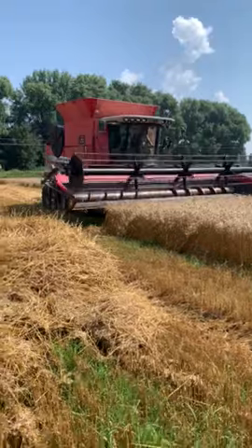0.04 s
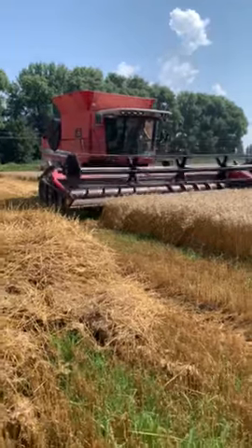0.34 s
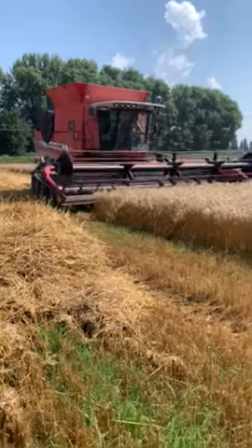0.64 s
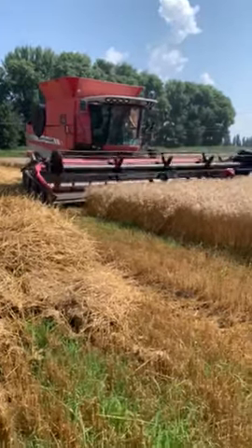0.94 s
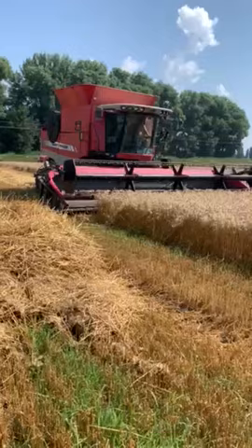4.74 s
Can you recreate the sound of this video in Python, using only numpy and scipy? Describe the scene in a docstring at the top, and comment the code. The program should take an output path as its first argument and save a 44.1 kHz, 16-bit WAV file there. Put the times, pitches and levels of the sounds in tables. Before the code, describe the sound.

Fast, even blade chatter and rhythmic metal knocking ride on the low diesel drone of a combine harvester cutting wheat. Straw hisses and crackles through the machine while panels rattle and steel squeaks faintly now and then. The sound holds steady at first, swells from about halfway as the harvester approaches, then stays louder with harder clicks. A phone picks it up across the open field, with the machine a little to the left.

```python
"""A deep, throbbing rumble of diesel and threshing drum: a combine harvester in a wheat field, cutting
towards a phone held some twenty metres off. The knife bar chatters ten times a second and makes the
header drone, the sieves knock three times on every shake, loose guards rattle, rubbing steel squeals
faintly, and dry straw crackles through the machine. Midway it all grows louder as the harvester nears."""
import sys
import numpy as np
from scipy import signal
from scipy.fft import rfft, irfft, next_fast_len
from scipy.io import wavfile
from scipy.ndimage import uniform_filter1d

SR = 44100
rng = np.random.default_rng(int(sys.argv[2]) if len(sys.argv) > 2 else 0)


def generate_wav(sig):
    """Save sig (samples, or channels by samples) to the path in sys.argv[1] as 16-bit PCM at SR."""
    pcm = np.round(np.clip(np.atleast_2d(sig).T, -1, 1) * 32767).astype(np.int16)
    wavfile.write(sys.argv[1], SR, pcm)


N = 426006
TIME = np.arange(N) / SR
CRANK_HZ, KNIFE_HZ, SIEVE_HZ = 36.39, 9.985, 3.588  # shaft rates at working speed
CLATTER_RISE_DB = 5.5  # what knife and sieves gain as the machine nears


# Drum and fans from across the field: (frequency [Hz], level [dB])
RUMBLE_SPECTRUM = [(20, -82.5), (32, -66), (44, -61.5), (70, -54.5), (100, -54), (135, -57), (190, -52),
                   (260, -58), (330, -60), (400, -67.5), (600, -68.5), (1500, -101)]
# The header's drone: (multiple of the knife rate [-], level [dB])
HEADER_DRONE = [(7, -54), (8, -51.5), (9, -46.5), (10, -47.5), (12, -45.5), (14, -54), (16, -41.5),
                (18, -39), (19, -50.5), (20, -39), (21, -47.5), (22, -47.5), (24, -48), (25, -49.5),
                (27, -44.5), (30, -48), (35, -58)]
# The machine's hollow body: (frequency [Hz], level [dB])
BOOM_SPECTRUM = [(150, -82), (205, -59.5), (240, -55), (285, -56), (320, -57.5), (360, -63), (450, -92)]
def thresher(clock):
    """Drum and fans rumble, the body booms; shaken twice a knife turn, the header drones and throbs."""
    turns = KNIFE_HZ * clock
    throb = 1 + .18 * np.cos(2 * np.pi * (2 * turns - .3))
    rumble = body(hiss() * throb, RUMBLE_SPECTRUM)
    drone = tones(turns + .0022 * walk(2.05), HEADER_DRONE, waver_db=2)
    boom = body(hiss() * throb, BOOM_SPECTRUM)
    return nearing(rise_db=4.5) * (rumble + drone) + nearing(rise_db=9) * boom


# The diesel, some twenty metres off: (multiple of the crank rate [-], level [dB])
DIESEL_ORDERS = [(2, -47.5), (3, -48.5), (7, -46), (9, -40.5), (12, -54), (13, -52.5), (17, -50), (18, -47),
                 (19, -51.5)]
def engine(clock):
    """The diesel hums at multiples of its crank rate; the governor hunts slightly."""
    return tones(CRANK_HZ * clock + .007 * walk(2), DIESEL_ORDERS, waver_db=1.5)


# The rush through the drum, heard from outside: (frequency [Hz], level [dB])
ROAR_SPECTRUM = [(200, -72), (400, -64), (520, -55.5), (700, -59), (950, -66), (1300, -64), (3000, -104.5)]
# The housing's resonance: (frequency [Hz], width [Hz], level [dB])
HOUSING_MODES = [(638, 30, -55.5)]
def drum_roar():
    """Air and crop rush through the hollow drum housing."""
    return body(hiss() * amp(.5 * walk(9)), ROAR_SPECTRUM, HOUSING_MODES)


# Struck steel, for knife, link and clanks alike: (frequency [Hz], level [dB])
STEEL_SPECTRUM = [(300, -100), (900, -67), (2500, -69), (4000, -62.5), (6300, -70.5), (8300, -69.5),
                  (11000, -76), (13000, -86), (16000, -81)]
# The knife bar's resonances: (frequency [Hz], width [Hz], level [dB])
KNIFE_MODES = [(4150, 300, -64), (4800, 520, -65), (8200, 700, -70)]
# Stalks shearing at the front of the machine: (frequency [Hz], level [dB])
SHEAR_SPECTRUM = [(400, -78), (1000, -92), (1800, -68), (2500, -70), (3500, -70), (4600, -85), (6200, -71),
                  (8300, -75.5), (11500, -77.5), (13000, -99), (16000, -102)]
def knife(clock):
    """The bar ticks as it reverses, then shears a ragged row of stalks; the return stroke is weaker."""
    turns = KNIFE_HZ * clock
    tick = strokes(turns, phase=.974, db=-2.7, scatter_db=1.2, rise_s=.0025, decay_s=.007)
    tick_back = strokes(turns, phase=.463, db=-8, scatter_db=2, rise_s=.0022, decay_s=.0085)
    shear = strokes(turns, phase=.01, db=-1, scatter_db=.8, rise_s=.012, decay_s=.022)
    shear_back = strokes(turns, phase=.53, db=-4.8, scatter_db=1.2, rise_s=.012, decay_s=.025)
    ragged = amp(1.8 * walk(130))
    steel = np.hypot(tick, tick_back) * crackle(per_s=10000, spread_db=3)
    stalks = np.hypot(shear, shear_back) * ragged * crackle(per_s=9000, spread_db=1)
    return body(steel, STEEL_SPECTRUM, KNIFE_MODES) + body(stalks, SHEAR_SPECTRUM)


# The knife head's hardest strikes: (time [s], level [dB])
HARD_STRIKES = [(.179, -25), (.401, -24.5), (.459, -23.5), (1.003, -24.5), (2.512, -21.5), (2.914, -24),
                (4.715, -22.5), (5.215, -23), (5.316, -20.5), (5.416, -20), (5.515, -22), (5.615, -21.5),
                (5.917, -22), (6.879, -21.5), (7.62, -17), (7.721, -19), (7.921, -19.5), (8.121, -16.5),
                (8.423, -14.5), (8.524, -19), (8.623, -19), (8.924, -20)]
# Its resonances: (frequency [Hz], width [Hz], level [dB])
HEAD_MODES = [(4700, 260, -43), (4930, 260, -44), (5250, 200, -47), (5540, 160, -51)]
def knife_head(clock):
    """Play in the knife head closes with a high click, part ring, part scrape; some strikes are hard."""
    click_shape = dict(rise_s=.0016, decay_s=.0021)
    regular = strokes(KNIFE_HZ * clock, phase=.977, db=-28, scatter_db=1.8, **click_shape)
    hard = bursts(*np.transpose(HARD_STRIKES), **click_shape)
    clicks = np.maximum(nearing(CLATTER_RISE_DB) * regular, hard)
    ring = unsteady_note(hz=4780, drift_cycles=.13, drift_per_s=500)
    scrape = unit(body(hiss(), STEEL_SPECTRUM, HEAD_MODES))
    ring_share = .7  # of the click's power
    return clicks * (np.sqrt(ring_share) * ring + np.sqrt((1 - ring_share) / 2) * scrape)


# The sieve pan's scuff, inside the machine: (frequency [Hz], level [dB])
PAN_SPECTRUM = [(300, -90), (600, -56.5), (950, -99), (1700, -63.5), (2500, -67.5), (3400, -65.5),
                (4300, -79), (8000, -86.5), (12000, -105), (16000, -113)]
# The link's resonances: (frequency [Hz], width [Hz], level [dB])
LINK_MODES = [(654, 64, -53.5), (1210, 130, -63), (1520, 125, -65.5), (1804, 86, -62), (1854, 64, -56),
              (2280, 130, -63)]
def sieves(clock):
    """On each shake the pan scuffs, then a link knocks sharply and chatters on; one knock is harder."""
    turns = SIEVE_HZ * clock
    scuff = strokes(turns, phase=.0091, db=3.5, scatter_db=.5, rise_s=.0035, decay_s=.019)
    knock = strokes(turns, phase=.416, db=4.5, scatter_db=.8, rise_s=.001, decay_s=.007)
    hard_knock = bursts(times=np.array([4.864]), db=[10.5], rise_s=.001, decay_s=.007)
    chatter = strokes(turns, phase=.46, db=-.5, scatter_db=.8, rise_s=.004, decay_s=.023)
    blows = np.hypot(np.maximum(knock, hard_knock), chatter)
    # the link's main mode, its pitch shaken by the rattling, carries better from close by
    note = unsteady_note(hz=1865, drift_cycles=.12, drift_per_s=60)
    ring = amp(-38.5) * nearing(rise_db=3.5) * blows * note
    pan = body(scuff * hiss(), PAN_SPECTRUM)
    link = body(blows * hiss(), STEEL_SPECTRUM, LINK_MODES, spectrum_db=-8.5)
    return pan + link + ring


# Loose steel at the sieve drive: (frequency [Hz], width [Hz], level [dB])
CLANK_MODES = [(654, 150, -59.5), (1960, 70, -55), (2720, 140, -66), (3560, 95, -62), (5260, 180, -71)]
def clanks(clock):
    """Once a shake the sieve drive reverses: loose steel rattles and one plate rings a clear note."""
    turns = SIEVE_HZ * clock
    reversal = strokes(turns, phase=.619, db=.5, scatter_db=.5, rise_s=.003, decay_s=.02)
    hard_s, hard_db = 8.84, 3.5  # one reversal hits harder than the rest
    force = amp(hard_db * (np.abs(TIME - hard_s) < .5 / SIEVE_HZ))
    ringing = strokes(turns, phase=.63, db=-31.5, scatter_db=1.2, rise_s=.005, decay_s=.017)
    plate = ringing * unsteady_note(hz=1456, drift_cycles=.3, drift_per_s=8)
    rattle = body(force * reversal * crackle(per_s=5900, spread_db=-4.5), STEEL_SPECTRUM, CLANK_MODES)
    return nearing(rise_db=5.5) * rattle + nearing(rise_db=8.5) * plate


# The sheet-metal guards: (frequency [Hz], time to fall 60 dB [s], level [dB])
GUARD_RINGS = [(1145, .055, -49.5), (1245, .1, -44), (1320, .08, -46.5), (1400, .08, -48.5),
               (1604, .09, -50), (1785, .07, -47), (1905, .06, -47)]
def guards(clock):
    """Loose guards rattle without pause, hardest just after each forward knife stroke."""
    taps_per_s, scatter_db = 260, 1.5
    jolt = strokes(KNIFE_HZ * clock, phase=.02, db=1.5, scatter_db=1, rise_s=.002, decay_s=.01)
    taps = (rng.random(N) < taps_per_s / SR) * amp(scatter_db * rng.standard_normal(N)) * (1 + jolt)
    t = TIME[:SR // 4]
    rattle = np.zeros(N)
    for hz, t60, db in GUARD_RINGS:
        ring = amp(-60 * t / t60) * np.sin(2 * np.pi * hz * t)
        strikes = taps * rng.uniform(-1, 1, N)  # every tap rings a new mixture of modes
        rattle += amp(db) * unit(signal.oaconvolve(strikes, ring)[:N])
    return rattle


# Chaff and grain streaming through the machine: (frequency [Hz], level [dB])
CHAFF_SPECTRUM = [(400, -68.5), (900, -74), (1400, -73), (2150, -64), (2450, -66), (3100, -72),
                  (3900, -64.5), (5500, -109), (6500, -72), (9600, -83.5), (11700, -79), (12700, -89),
                  (16000, -81)]
# The panels they brush: (frequency [Hz], width [Hz], level [dB])
PANEL_MODES = [(1240, 170, -63), (1420, 110, -66), (1620, 130, -65.5), (1800, 130, -66), (2630, 110, -70.5),
               (3050, 150, -70.5), (3560, 260, -70), (4170, 200, -68), (4400, 200, -68), (4720, 260, -67),
               (4920, 130, -70), (5240, 200, -70), (5540, 160, -72.5), (6050, 250, -76), (8170, 600, -73),
               (8700, 500, -78), (9650, 350, -78)]
# The finest snaps of straw: (frequency [Hz], level [dB])
SNAP_SPECTRUM = [(2000, -99), (6000, -110), (10500, -80.5), (13000, -105), (16000, -103)]
def straw():
    """Chaff and grain stream along sheet-metal panels, with dry stalks snapping among them."""
    surge = amp(.55 * walk(15))
    flow = surge * (.62 * hiss() + .25 * crackle(per_s=2600, spread_db=2))
    snaps = crackle(per_s=690, spread_db=4)
    return body(flow, CHAFF_SPECTRUM, PANEL_MODES) + body(snaps, SNAP_SPECTRUM)


# Squeals, faint at this distance: (start [s], length [s], pitch [Hz], level [dB])
STEEL_RUBS = [(0, .55, 4460, -47), (2.8, 1.8, 4930, -49), (8.9, .25, 4440, -44)]
def squeals():
    """Steel rubs on steel for a moment and sings a thin, unsteady note."""
    out = np.zeros(N)
    for start, length, hz, db in STEEL_RUBS:
        progress = np.clip((TIME - start) / length, 0, 1)
        swell = np.sqrt(np.abs(np.sin(np.pi * progress)))
        out += amp(db + 3 * walk(25)) * swell * unsteady_note(hz, drift_cycles=.3, drift_per_s=70)
    return out


# Dips in the clatter on its way to the microphone: (frequency [Hz], gain [dB])
WALL_NOTCHES = [(2050, 0), (2330, -1.5), (2440, -3), (2570, 0), (3680, 0), (3790, -6), (3950, -4),
                (4120, 0), (6150, 0), (6400, -2), (6800, 0)]
def walls(clatter):
    """The machine's sheet-metal walls mirror the clatter and cancel a few narrow bands."""
    return body(clatter, WALL_NOTCHES)


# What the field around the microphone throws back: (frequency [Hz], gain [dB])
FIELD_SCATTER = [(80, -32.5), (300, -17), (1000, -14.5), (1700, -4.5), (3500, -6.5), (4800, -53),
                 (5800, -0.5), (9000, -40), (16000, -12)]
def field(x):
    """Swaying wheat and trees scatter a faint, late, ever-changing copy to each side."""
    scattered = body(x, FIELD_SCATTER)
    late = [np.pad(scattered, (int(lag_s * SR), 0))[:N] for lag_s in (.007, .011)]
    return np.array([side * walk(90) for side in late])


# The phone's two microphone ports: (frequency [Hz], left minus right [dB], left's phase lead [rad])
MICROPHONE_PAIR = [(60, -1.2, 0), (140, -3.3, .1), (200, -4.8, 0), (250, .5, .2), (330, .2, 1.7),
                   (550, 0, 2.7), (1000, 0, 2.4), (1420, -.8, 1.1), (1550, 2.2, -.3), (1690, -3, -.9),
                   (1725, -4, 2.1), (1820, .5, 1.9), (2380, -.3, 1.8), (2480, -.5, 2.7), (2700, 0, 2),
                   (3200, 0, 1.3), (3700, 0, 1.6), (4750, 0, 3.14), (5500, 0, 4.75), (6850, 0, 6.28),
                   (15300, 0, 18.85)]
def microphone_ports(x):
    """The machine stands to the left, so its sound reaches the left port first."""
    size = next_fast_len(N + SR // 10)
    f = np.fft.rfftfreq(size, 1 / SR)
    hz, balance_db, lead = np.transpose(MICROPHONE_PAIR)
    left = amp(np.interp(f, hz, balance_db) / 2) * np.exp(.5j * np.interp(f, hz, lead))
    return irfft(rfft(x, size) * np.array([left, 1 / left]), size)[:, :N]


# The drive under load: (time [s], share of working speed [-])
SPEED_CURVE = [(2.25, .9952), (2.35, .999), (3.6, .9985), (4, 1.0025), (4.6, 1.0025), (5, .9995),
               (8, .9995), (8.6, .997), (9.66, .9965)]
def drive_clock():
    """Seconds as the shafts count them: the drive sags and picks up with the load."""
    return np.cumsum(np.interp(TIME, *np.transpose(SPEED_CURVE))) / SR


def nearing(rise_db):
    """Gain of mean power 1: steady, then growing by rise_db as the machine nears, then steady again."""
    start_s, end_s = 4.27, 7.35
    return unit(amp(rise_db * np.interp(TIME, [start_s, end_s], [0, 1])))


def strokes(turns, phase, db, scatter_db, rise_s, decay_s):
    """Envelope of one blow per shaft turn, at the share of the turn given by phase; none equally hard."""
    times = np.interp(np.arange(int(turns[-1] - phase) + 1) + phase, turns, TIME)
    return bursts(times, db + scatter_db * rng.standard_normal(len(times)), rise_s, decay_s)


def bursts(times, db, rise_s, decay_s):
    """Envelope of blows that swell briefly and die away, each peaking at its dB."""
    t = TIME[:SR // 4]
    shape = (1 - np.exp(-t / rise_s)) * np.exp(-t / decay_s)
    blows = np.bincount(np.clip(times * SR, 0, N - 1).astype(int), amp(db) ** 2, N)
    return np.sqrt(np.abs(signal.oaconvolve(blows, (shape / shape.max()) ** 2)[:N]))


def body(x, spectrum, modes=(), spectrum_db=0, size=8192):
    """Ring x through a causal filter made of a broad spectrum and resonances."""
    f = np.fft.rfftfreq(size, 1 / SR) + 1e-3
    curve_hz, curve_db = np.transpose(spectrum)
    power = amp(np.interp(np.log(f), np.log(curve_hz), curve_db) + spectrum_db) ** 2
    for hz, width, db in modes:
        detuning = (f / hz - hz / f) * hz / width
        power += amp(db) ** 2 / (1 + detuning ** 2 / 2) ** 2
    # minimum phase, so the ringing follows the blow
    cepstrum = irfft(np.log(power) / 2)
    cepstrum[1:size // 2] *= 2
    cepstrum[size // 2 + 1:] = 0
    response = irfft(np.exp(rfft(cepstrum)))[:size // 2]
    return signal.oaconvolve(x, response)[:N]


def tones(turns, orders, waver_db):
    """Multiples of a shaft rate, each wavering in the open air."""
    out = np.zeros(N)
    for order, db in orders:
        level = np.sqrt(2) * amp(db + waver_db * walk(3.2))
        out += level * np.sin(2 * np.pi * (order * turns + rng.random()))
    return out


def unsteady_note(hz, drift_cycles, drift_per_s):
    """A sine whose phase wanders at random."""
    return np.sin(2 * np.pi * (hz * TIME + drift_cycles * walk(drift_per_s)))


def crackle(per_s, spread_db):
    """Tiny snaps of unequal size at random times, 0 dB per Hz in all."""
    snaps = (rng.random(N) < per_s / SR) * rng.choice([-1, 1], N)
    sizes = amp(spread_db * np.minimum(rng.exponential(size=N), 6))
    return unit(snaps * sizes) * np.sqrt(SR / 2)


def hiss():
    """White noise of 0 dB per Hz."""
    return rng.standard_normal(N) * np.sqrt(SR / 2)


def walk(per_s):
    """A random wander of rms 1: per_s new levels a second, smoothed twice."""
    hold = max(int(SR / per_s), 1)
    steps = np.repeat(rng.standard_normal(N // hold + 1), hold)
    return unit(uniform_filter1d(uniform_filter1d(steps, hold), hold)[:N])


def amp(db):
    """Decibels to gain."""
    return 10 ** (np.asarray(db) / 20)


def unit(x):
    """Scale to rms 1."""
    return x / np.sqrt(np.mean(x ** 2))


def scene():
    """One engine drives every shaft, and the whole machine grows louder as it nears the microphone."""
    clock = drive_clock()
    rumble = nearing(rise_db=3.5) * engine(clock) + thresher(clock)
    crop = nearing(rise_db=3.2) * straw()
    clatter = nearing(CLATTER_RISE_DB) * (knife(clock) + sieves(clock)) + knife_head(clock)
    rattle = clanks(clock) + nearing(rise_db=5.5) * guards(clock)
    machine = rumble + walls(crop + clatter + rattle) + squeals() + nearing(rise_db=6.5) * drum_roar()
    return microphone_ports(machine) + field(machine)


def record(dry):
    """The phone drops the deepest bass and cuts the top."""
    bottom_hz, top_hz = 36, 15700
    lean = signal.sosfilt(signal.butter(6, bottom_hz, "high", fs=SR, output="sos"), dry)
    return signal.sosfilt(signal.ellip(10, .2, 80, top_hz, fs=SR, output="sos"), lean)


dry = scene()
out = record(dry)
generate_wav(out)
```